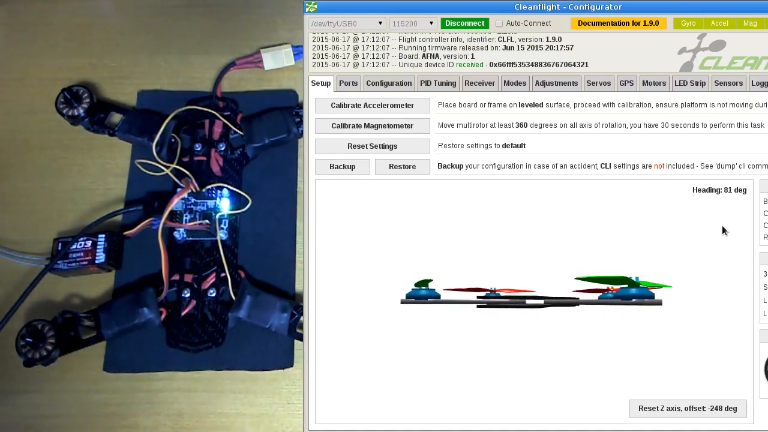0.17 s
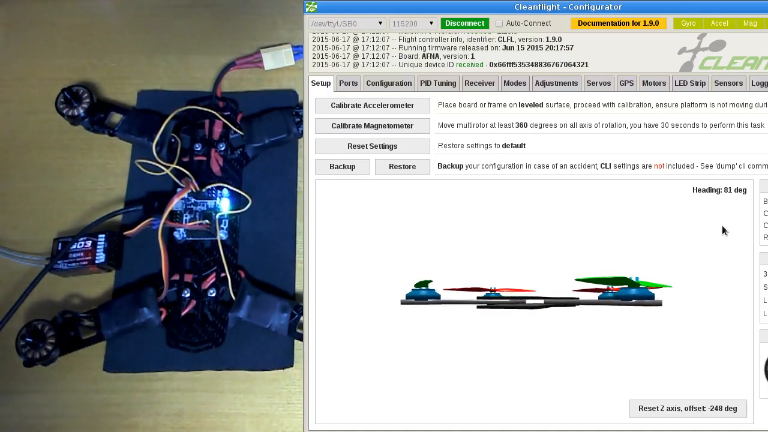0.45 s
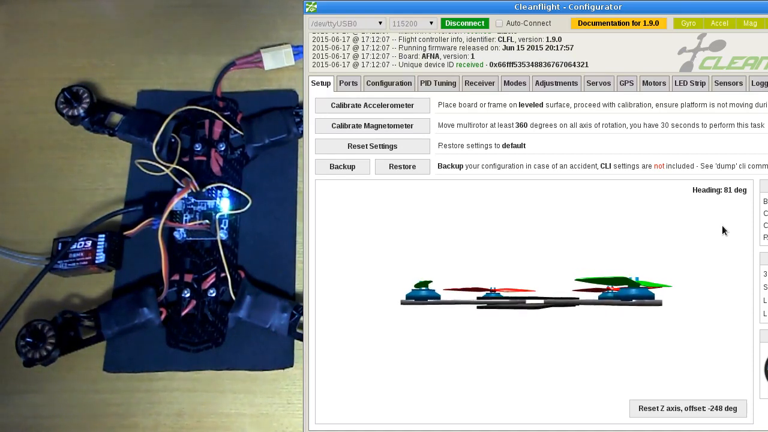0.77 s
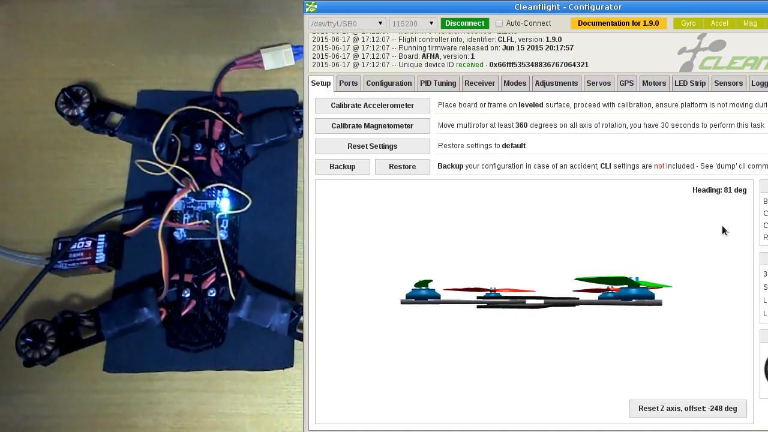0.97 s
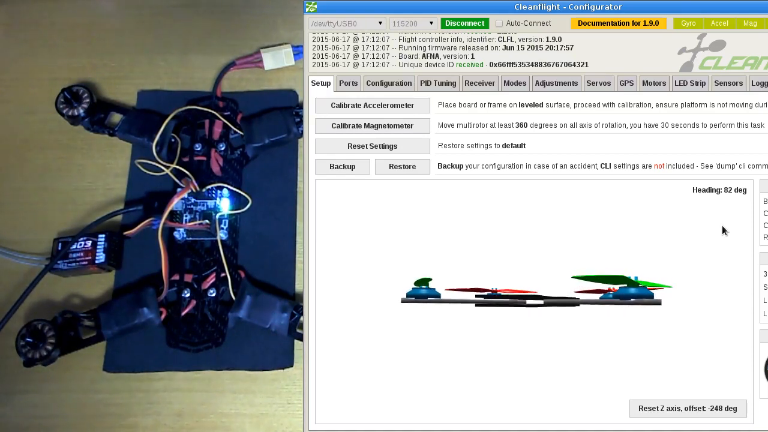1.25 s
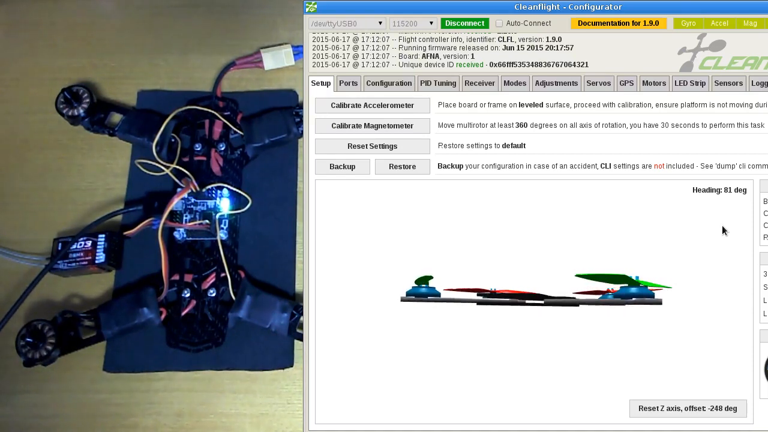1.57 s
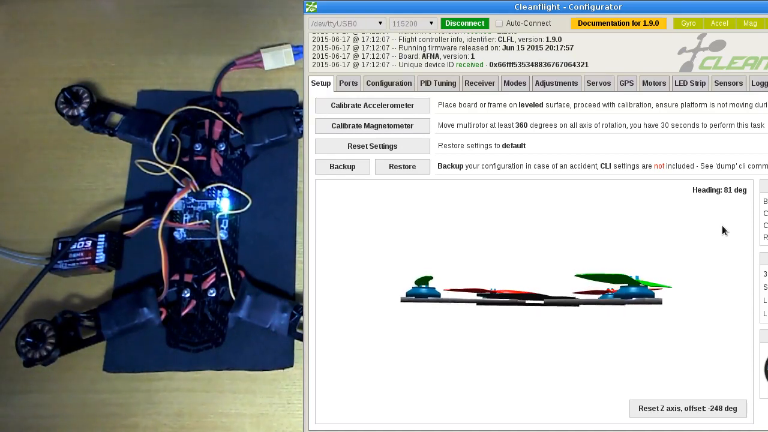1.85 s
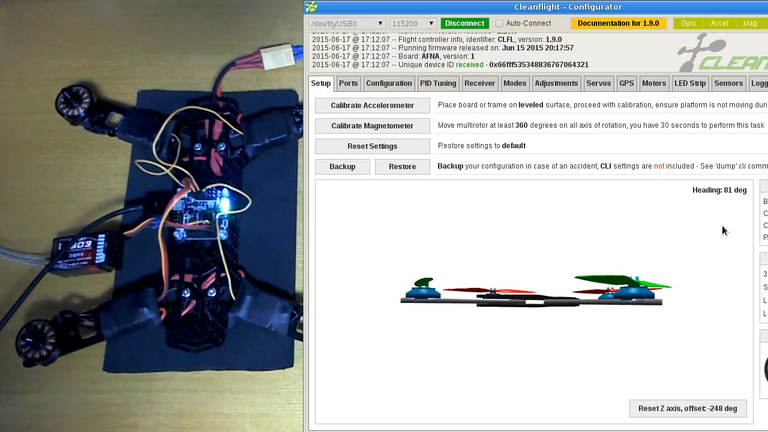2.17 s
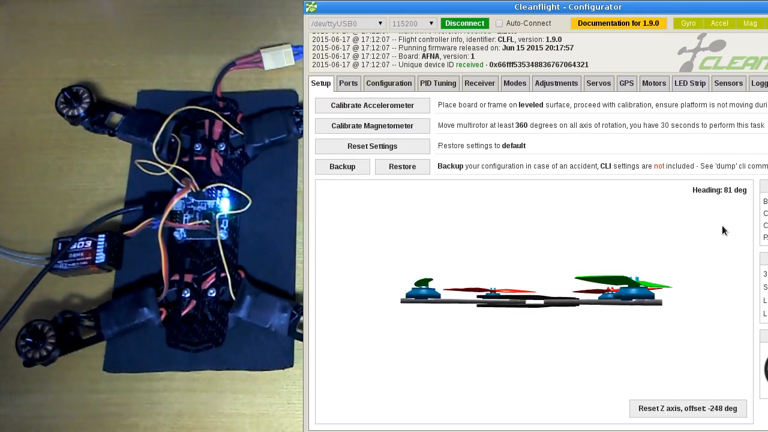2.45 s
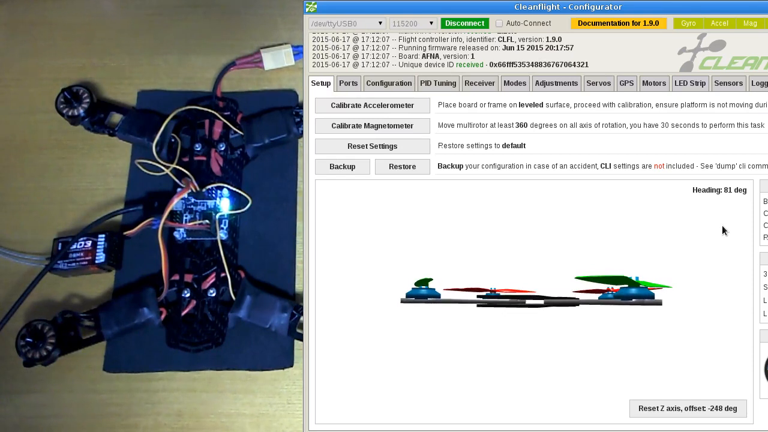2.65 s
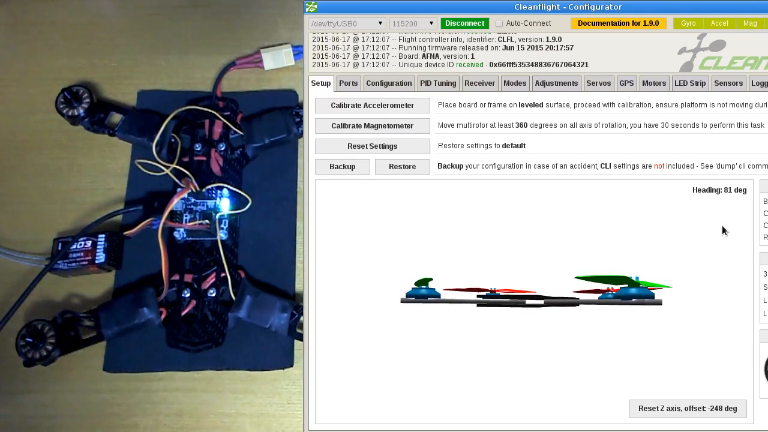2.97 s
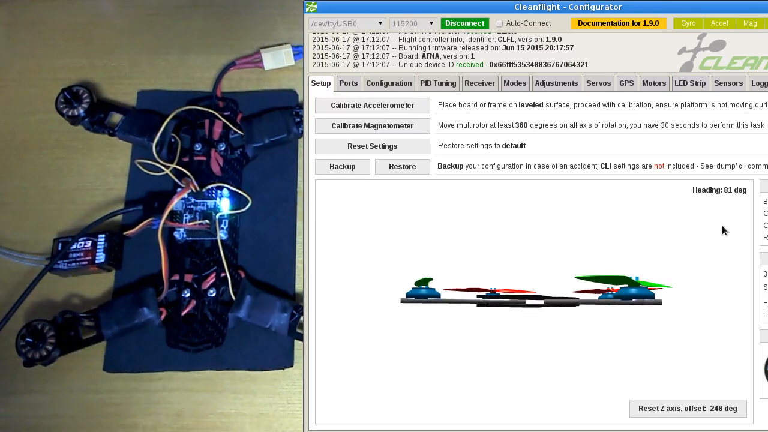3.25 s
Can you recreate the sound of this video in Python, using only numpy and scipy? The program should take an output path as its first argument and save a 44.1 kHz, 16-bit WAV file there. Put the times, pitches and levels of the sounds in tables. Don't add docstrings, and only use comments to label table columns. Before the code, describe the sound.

Small brushless motors without propellers whine shrilly on a bench, one tone wavering at first, then steady. A short plastic ratchet and knock follow, then the whine and hiss slide down. Close, nearly mono, quiet room.

```python
import sys
import numpy as np
from scipy import signal
from scipy.io import wavfile

SR = 44100
rng = np.random.default_rng(int(sys.argv[2]) if len(sys.argv) > 2 else 0)


def convert_level_to_amplitude(level_db):
    exponent = np.asarray(level_db, float) / 20
    return 10 ** exponent


def to_wav(s):
    ch = np.atleast_2d(s).T
    pcm = np.round(np.clip(ch, -1, 1) * 32767)
    wavfile.write(sys.argv[1], SR, pcm.astype(np.int16))


N = 149940
T_S = np.arange(N) / SR


def rms_one(x):
    return x / np.sqrt(np.mean(x ** 2) + 1e-20)


def in_time(rows):
    s, *columns = np.transpose(rows)
    return [np.interp(T_S, s, c) for c in columns]


def sine(hz):
    return np.sqrt(2) * np.sin(2 * np.pi * np.cumsum(hz) / SR)


def sigmoid(x):
    return 1 / (1 + np.exp(-x))


def drift(rate_hz):
    r = np.exp(-80 * np.pi * rate_hz / SR)
    kicks = rng.standard_normal(N // 40 + 2002)
    slow = rms_one(signal.lfilter([1], [1, -2 * r, r * r], kicks)[2000:])
    return np.interp(np.arange(N) / 40, np.arange(len(slow)), slow)


def resonate(x, hz, width_hz):
    r = np.exp(-np.pi * width_hz / SR)
    zeros = (1 - r * r) / 2 * np.array([1, 0, -1])
    return signal.lfilter(zeros, [1, -2 * r * np.cos(2 * np.pi * hz / SR), r * r], x)


def banded_noise(spectrum, follows):
    hz, db = np.transpose(spectrum)
    count = int(3 * np.log2(hz[-1] / hz[0])) + 1
    edges = np.geomspace(hz[0], min(hz[-1], 16500), count)
    white = rng.standard_normal((2, N + 4000))
    steady = changing = 0
    for k, (lo, hi) in enumerate(zip(edges, edges[1:])):
        mid = np.sqrt(lo * hi)
        sos = signal.butter(2, [lo, hi], "band", fs=SR, output="sos")
        band = signal.sosfilt(sos, white[k % 2])[-N:]
        band = band * convert_level_to_amplitude(np.interp(np.log(mid), np.log(hz), db))
        steady = steady + band
        changing = changing + band * convert_level_to_amplitude(follows(mid))
    return changing / np.std(steady)


# f/Hz, density/dB per Hz
ROOM_SPECTRUM = [(30, -8), (50, -7), (70, -6), (130, -5.5), (250, -3), (320, -9.5), (700, -10),
                 (2000, -20.5)]


def room():
    hum = convert_level_to_amplitude(-63.5 + 1.5 * drift(6.9)) * sine(np.full(N, 49.2))
    return convert_level_to_amplitude(-58.5) * banded_noise(ROOM_SPECTRUM, lambda hz: 0) + hum


# t/s, speed/turns per s
SHAFT = [(0, 287.0), (2.36, 286.3), (2.45, 283), (2.55, 265), (2.67, 235.8), (2.79, 196), (2.9, 155),
         (3.02, 122), (3.1, 104), (3.2, 86), (3.4, 56)]


def shaft_speed():
    full_hz = 286.5
    return in_time(SHAFT)[0] / full_hz


BELLS_HZ = [112, 222, 2440, 3025, 4900, 9040]
# width/Hz, tone lift/dB, hiss lift/dB
BELLS = [(25, 10, 0), (29.6, 20.5, 0), (109, 17.5, -1), (157, 18, 7.5), (506, 4, -6.5), (170, 12, 12)]


def lift_db(hz, high):
    radiates_above_hz, slope = 3080, 7.3
    power = 1
    for f, (width_hz, db, _) in zip(BELLS_HZ, BELLS):
        power = power + convert_level_to_amplitude(db) ** 2 / (1 + (2 * (hz - f) / width_hz) ** 2)
    return 10 * np.log10(power / (1 + high * (radiates_above_hz / hz) ** slope))


def gliding(hz, db, rest_hz):
    high = rest_hz > 1000
    coarse_hz = hz[::32]
    swell_db = lift_db(coarse_hz, high) - lift_db(rest_hz, high)
    swell_db = np.interp(np.arange(N), np.arange(len(coarse_hz)) * 32, swell_db)
    turns = np.cumsum(hz) / SR + rng.random()
    return np.sqrt(2) * convert_level_to_amplitude(db + swell_db) * np.sin(2 * np.pi * turns)


# f/Hz, density/dB per Hz
HISS_SPECTRUM = [(500, -40), (1000, -13.5), (2700, -2), (3600, 0.5), (6600, -2.5), (8500, 0.5),
                 (11000, -15), (15600, -8.5)]


def hiss():
    at_bell, per_octave = 0.34, 0.79
    speed_db = 20 * np.log10(shaft_speed())

    def follows(hz):
        return speed_db * (at_bell + per_octave * abs(np.log2(hz / 2800)))

    noise = banded_noise(HISS_SPECTRUM, follows)
    out = noise
    for hz, (width_hz, _, db) in zip(BELLS_HZ[2:], BELLS[2:]):
        out = out + convert_level_to_amplitude(db) * resonate(resonate(noise, hz, width_hz), hz, 2 * width_hz)
    return convert_level_to_amplitude(-29.5) * out


# t/s, f/Hz, level/dB
PRESS = [
    (2.27, 120, -79),
    (2.32, 120, -59),
    (2.36, 94, -57),
    (2.41, 111, -49),
    (2.46, 126, -60),
    (2.54, 125, -48),
    (2.65, 121, -60),
    (2.72, 122, -80),
]


def pressed_bench():
    pitch_hz, db = in_time(PRESS)
    return convert_level_to_amplitude(db) * sine(pitch_hz)


# t/s, rate/teeth per s, level/dB
RATCHET = [
    (2.38, 125, -55),
    (2.42, 135, -44),
    (2.445, 144, -41),
    (2.48, 133, -44.5),
    (2.515, 127, -46.5),
    (2.54, 110, -45),
]
# f/Hz, width/Hz, level/dB
HOUSING = [(428, 44, -13), (873, 75, -0.5), (1150, 130, -6.5), (1310, 180, -8)]


def ratchet():
    rate, db = in_time(RATCHET)
    clicks = np.diff(np.floor(np.cumsum(rate) / SR), prepend=0)
    teeth = clicks * convert_level_to_amplitude(2.0 * rng.standard_normal(N)) + 0.02 * rng.standard_normal(N)
    ticks = 0
    for k, (hz, width_hz, d) in enumerate(HOUSING):
        ticks = ticks + convert_level_to_amplitude(d) * resonate(teeth, hz, width_hz) * (-1) ** k
    moving = (db > db[0]) * (T_S < RATCHET[-1][0])
    return rms_one(ticks) * convert_level_to_amplitude(db) * moving


# f/Hz, level/dB, t60/s
STOP = [(125, -12, .15), (380, -8.5, 0.023), (740, -4, 0.021), (1000, 0, 0.027), (1345, -4, 0.024)]


def stop_knock():
    knock_s, knock_db, rise_s = 2.551, -24.5, 0.0012
    after_s = np.maximum(T_S - knock_s, 0)
    out = 0
    for hz, db, t60_s in STOP:
        decay = convert_level_to_amplitude(knock_db + db - 60 * after_s / t60_s)
        out = out + decay * np.sin(2 * np.pi * hz * after_s)
    return out * (1 - np.exp(-after_s / rise_s))


TONES_HZ = [286.5, 274, 597.5, 619, 2132, 3316, 3343, 3441, 3473, 3728, 3957, 4016, 4167, 4362, 4540, 5057,
            5230, 5332, 5638, 5942, 6124, 6300, 6500, 6674, 7642, 7744, 8075, 8712, 12445, 13090]
# level/dB, change at drive cut/dB
TONES = [(-56, -3), (-61, 1), (-61, -20), (-67, -20), (-50, -15), (-47, -5), (-49, -5), (-39, -6),
         (-46, -5), (-36, -8), (-49, 0), (-42, 0), (-46, -5), (-52, -3), (-53, -3), (-46, -3), (-49, -3),
         (-54, -3), (-48, 8), (-53, -8), (-47, -5), (-49, -5), (-54, -3), (-55, 0), (-51, -3), (-46, -8),
         (-47, 4), (-46, -2), (-63, -4), (-65, -4)]


def steady_motors():
    cut_s, cut_fade_s = 2.52, 0.036
    follows, flutter_db, jitter = 0.27, 2, 0.000289
    speed = shaft_speed()
    coasting = sigmoid((T_S - cut_s) / cut_fade_s)
    out = 0
    for hz, (db, cut_db) in zip(TONES_HZ, TONES):
        pitch_hz = hz * speed * (1 + jitter * drift(5.95))
        level_db = db + cut_db * coasting + follows * 20 * np.log10(speed) + flutter_db * drift(9.5)
        out = out + gliding(pitch_hz, level_db, hz)
    return out


# t/s, f/Hz
SONG_PITCH = [(0, 3090), (.2, 3106), (.6, 3108), (.84, 3072), (1.05, 3049), (1.26, 3039), (1.5, 3027),
              (1.9, 3021), (2.05, 3023), (2.1, 3032), (2.2, 3026), (2.4, 3026), (2.46, 3005), (2.52, 2955),
              (2.57, 2880), (2.7, 2480), (3.1, 1150), (3.4, 620)]
# t/s, level/dB
SONG = [
    (0, -21.5),
    (.6, -21.5),
    (.84, -21),
    (1.5, -23.5),
    (2.4, -20.5),
    (2.47, -21),
    (2.52, -19.5),
    (2.57, -26.5),
    (2.7, -31.5),
    (3.4, -34),
]
PARTIALS_HZ = [3021, 2853, 3284, 3661, 4290, 4775, 7052, 7364, 7795, 7849, 8129, 8317, 8730, 8899, 9063,
               9399, 9738]
# level re song/dB, extra while wavering/dB
SONG_PARTIALS = [(2, -1), (-24, 2), (-22.5, 0), (-23, 5.5), (-21.5, -9), (-20, -22), (-18.5, 2.5),
                 (-27, -2), (-15.5, 2), (-27, 0), (-21, 0), (-15, -5), (-27, 12.5), (-11.5, -4), (-2.5, 1),
                 (-20, 0), (-25, 0)]


def singing_motor():
    settled_hz, jitter = 3021, 0.00054
    waver_hz, waver_share, waver_peak_s, waver_end_s, waver_fade_s = 10.1, 0.005, 0.38, 0.78, 0.047
    throb_hz, throb_peak_s, throb_low_db, throb_high_db = 4.264, 2.03, 2.5, 0.5
    (pitch_hz,), (song_db,) = in_time(SONG_PITCH), in_time(SONG)
    unsettled = sigmoid((waver_end_s - T_S) / waver_fade_s)
    waver = waver_share * unsettled * np.cos(2 * np.pi * waver_hz * (T_S - waver_peak_s))
    ratio = pitch_hz / settled_hz * (1 + waver + jitter * drift(20.0))
    throb = np.cos(2 * np.pi * throb_hz * (T_S - throb_peak_s))
    out = 0
    for hz, (rel_db, early_db) in zip(PARTIALS_HZ, SONG_PARTIALS):
        throb_db = throb_low_db if hz < 6000 else throb_high_db
        level_db = song_db + rel_db + early_db * unsettled + throb_db * throb + 0.72 * drift(15.5)
        out = out + gliding(hz * ratio, level_db, hz)
    return out


def scene():
    mid = room() + hiss() + pressed_bench() + ratchet() + stop_knock() + steady_motors() + singing_motor()
    side = convert_level_to_amplitude(-33) * np.roll(mid, 40) * drift(35.0)
    side = side + convert_level_to_amplitude(-58) * resonate(rng.standard_normal(N), 45, 60)
    side = side + convert_level_to_amplitude(-58.5) * resonate(rng.standard_normal(N), 1700, 1000)
    return np.array([mid + side, mid - side])


def top_cut(x):
    return signal.sosfilt(signal.butter(12, 15640, fs=SR, output="sos"), x)


def record(dry):
    low_pass = signal.cheby2(12, 60, 16270, fs=SR, output="sos")
    return top_cut(signal.sosfilt(low_pass, dry))


dry = scene()
out = record(dry)
to_wav(out)
```